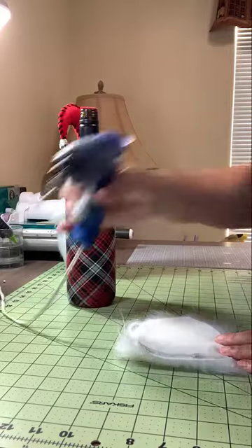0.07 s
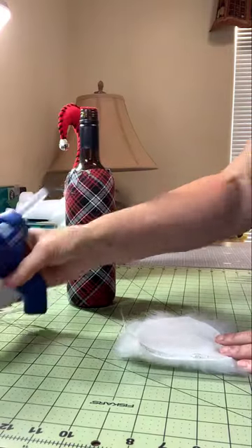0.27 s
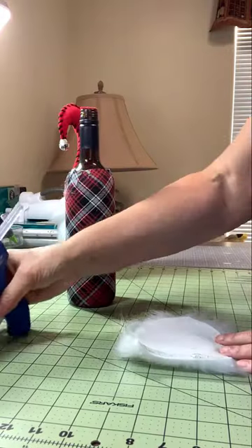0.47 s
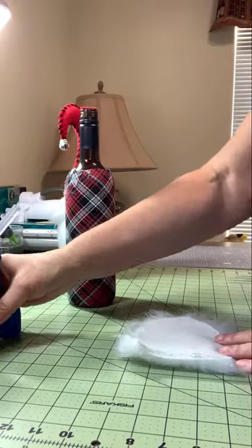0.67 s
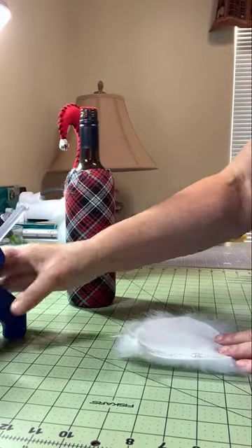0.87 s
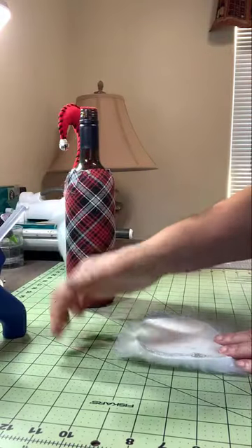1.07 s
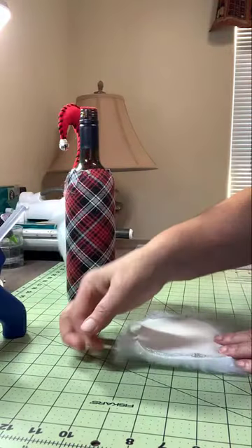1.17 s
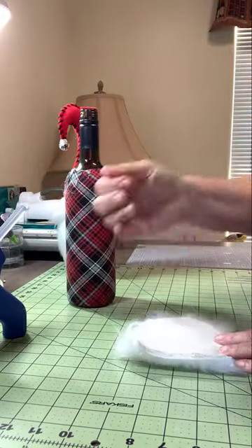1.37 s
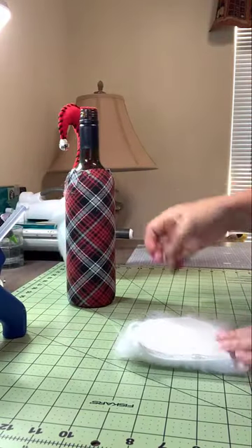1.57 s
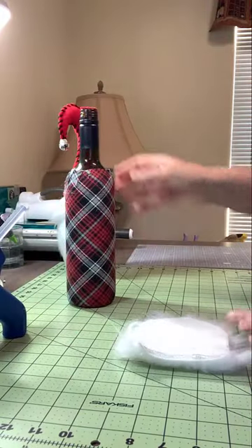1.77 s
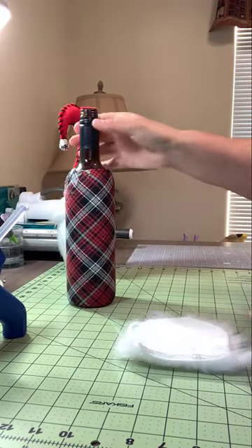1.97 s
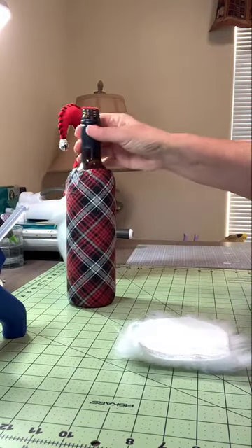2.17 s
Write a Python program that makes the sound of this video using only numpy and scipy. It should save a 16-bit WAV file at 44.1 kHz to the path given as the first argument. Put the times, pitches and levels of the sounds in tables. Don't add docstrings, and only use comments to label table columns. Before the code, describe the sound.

A plastic glue gun clicks in the hand, knocks sharply on a matted table, rattles faintly and lands with a low thud, then small ticks and cloth rubbing follow, close up in a small room.

```python
import sys
import numpy as np
from scipy import signal
from scipy.fft import rfft, irfft
from scipy.io import wavfile

SR = 44100
rng = np.random.default_rng(int(sys.argv[2]) if len(sys.argv) > 2 else 0)


def generate_wav(sig):
    pcm = np.round(np.clip(np.atleast_2d(sig).T, -1, 1) * 32767).astype(np.int16)
    wavfile.write(sys.argv[1], SR, pcm)


def volts_from_decibels(level):
    exponent = np.asarray(level, float) / 20
    return 10 ** exponent


N = 97725

# (time [s], peak level [dB], table modes [dB], table boom [dB], rattle length [s])
KNOCKS = [
    (0.1148, -14, -36.5, -32.5, 0.0065),
    (0.4814, -5.5, -22, -24.5, 0.018),
    (0.8037, -42.5, -13, -41, 0.073),
    (1.149, -31, -22.5, -8, 0.015),
    (1.8191, -22.5, -44, -26.5, 0.016),
]
# (time [s], level [dB])
CLOTH_PRESSURE = [(1.742, -76), (1.83, -64), (1.859, -64), (1.99, -59), (2.065, -58.5), (2.09, -61.5),
                  (2.26, -66)]
GRAINS_PER_S, GRAIN_SPREAD_DB = 6000, 2


def rms_one(x):
    return x / np.sqrt(np.mean(x ** 2) + 1e-20)


def at_hz(points, hz):
    table_hz, values = np.array(points).T
    return np.interp(np.log(hz), np.log(table_hz), values)


def gain_over_time(rows):
    s, db = np.transpose(rows)
    return volts_from_decibels(np.interp(np.arange(N) / SR, s, db, left=-150, right=-150))


def colour(x, spectrum):
    hz = np.arange(4097) * SR / 8192 + 1
    (low_hz, low_db), (high_hz, high_db) = spectrum[0], spectrum[-1]
    curve = [(low_hz / 4, low_db - 30)] + list(spectrum) + [(high_hz * 1.3, high_db - 30)]
    cepstrum = irfft(at_hz(curve, hz) * np.log(10) / 20)
    cepstrum[1:4096] *= 2
    cepstrum[4097:] = 0
    impulse = irfft(np.exp(rfft(cepstrum)))
    return signal.fftconvolve(x, impulse)[:len(x)]


def ring(clicks, hz, t60):
    radius = volts_from_decibels(-60 / (max(t60, 1e-3) * SR))
    angle = 2 * np.pi * hz / SR
    poles = [1, -2 * radius * np.cos(angle), radius * radius]
    return signal.lfilter([0, np.sin(angle)], poles, clicks + 1e-18)


def grains(rate, spread_db, size):
    sizes = volts_from_decibels(spread_db * np.minimum(rng.exponential(1, size), 5))
    sizes = sizes * rng.choice([-1, 1], size)
    return rms_one(sizes * (rng.random(size) < rate / SR))


def table_top(push, modes_db, boom_db):
    # (frequency [Hz], level [dB], t60 [s])
    table_modes = [(210, -18.5, 0.042), (315.4, -9, 0.21), (375.7, -8.5, 0.16), (430, -6.5, 0.07),
                   (449, 4, 0.029), (543, -0.5, 0.09), (605, -12, 0.086), (721, 0.5, 0.025),
                   (765, -11.5, .1), (879, -1, 0.032), (949, -10, .1), (1024, -14, 0.01),
                   (2140, -6, 0.0033), (3720, -3, 0.0071)]
    most_cycles, boom_hz, boom_t60_s, boom_cycles = 72, 135.6, 0.25, 30
    out = volts_from_decibels(boom_db) * ring(push, boom_hz, min(boom_t60_s, boom_cycles / boom_hz))
    for k, (hz, db, t60) in enumerate(table_modes):
        out += (-1) ** k * volts_from_decibels(db + modes_db) * ring(push, hz, min(t60, most_cycles / hz))
    return out


def knocks():
    # (frequency [Hz], level [dB per Hz])
    crack_tones = [
        [(530, -84.5), (900, -2), (2250, 5.5), (3140, 12.5), (3890, -13), (9300, -2.5), (15500, -29)],
        [(710, -39), (1200, 13.5), (2190, 16), (2480, 20), (4480, -3.5), (5260, 9.5), (10200, 9.5), (15500, -8)],
        [(410, -14), (700, 7), (1240, 4), (3680, -12), (4700, -34), (8320, -17), (15500, -59.5)],
        [(150, -38), (250, 6), (1610, -23.5), (1760, -15), (2200, -9.5), (2900, -22.5), (8320, -10),
         (15500, -36)],
        [(2350, -37), (4000, -32), (5590, -34), (6480, -26), (8220, -7), (9960, -13.5), (15500, -21)],
    ]
    click_levels = [17, 9, 8, 2, 6]
    crack_decays = [0.0011, 0.0071, 0.0076, 0.02, .006]
    rattle_levels = [-13, -25, -5, -4, -23.5]
    # (delay [s], level [dB])
    bounces = [
        (.002, 2.5),
        (.0048, 5),
        (0.0095, -1.5),
    ]
    crack_level_db, rattle_per_s, rattle_contrast = -9, 4500, 0.6
    room_crack_db, room_table_db, thump_cut_hz = 0.5, 0.5, 6720

    out, t = np.zeros((2, N + SR)), np.arange(8192) / SR
    start = 1. * (t == 0)
    settings = zip(KNOCKS, crack_tones, rattle_levels, click_levels, crack_decays)
    for (s, db, modes_db, boom_db, rattle_s), tone, rattle_db, click_db, crack_s in settings:
        even_tone = [(hz, rattle_contrast * d) for hz, d in tone]
        scale = np.std(colour(rng.standard_normal(len(t)), tone))

        burst = rng.choice([-1, 1], len(t)) * volts_from_decibels(crack_level_db - 60 * t / crack_s)
        burst = burst - volts_from_decibels(crack_level_db + click_db) * start
        crack = colour(burst, tone) / scale
        room_crack = volts_from_decibels(room_crack_db) * rms_one(colour(start, even_tone)) * np.std(crack)

        rattle = grains(rattle_per_s, 1.63, len(t)) * volts_from_decibels(rattle_db - 60 * t / max(rattle_s * 4, 1e-3))
        rattle = rms_one(colour(rattle, even_tone)) * np.std(rattle)

        i = int(s * SR)
        out[0, i:i + len(t)] += volts_from_decibels(db) * (crack + rattle)
        out[1, i:i + len(t)] += volts_from_decibels(db) * (room_crack + rattle)

        push = np.zeros(len(t) * 3)
        push[0] = -1
        for lag, bounce_db in bounces:
            push[int(lag * SR)] = -volts_from_decibels(bounce_db)
        push = signal.lfilter(*signal.butter(1, thump_cut_hz, fs=SR), push)
        push = push * SR / (2 * np.pi * thump_cut_hz)
        table = table_top(push, modes_db, boom_db)
        out[0, i:i + len(push)] += volts_from_decibels(db) * table
        out[1, i:i + len(push)] += volts_from_decibels(db + room_table_db) * table
    return out[:, :N]


def ticks():
    # (time [s], peak level [dB], pitch [Hz], t60 [s])
    tick_events = [(.004, -48.5, 4275, 0.14), (0.017, -43, 4340, 0.06), (0.0689, -39.5, 2580, 0.011),
                   (0.0697, -47.5, 8500, 0.0099), (.078, -66, 9400, 0.03), (0.2952, -39.5, 11590, 0.06),
                   (0.2933, -57, 5800, 0.032), (.2955, -32.5, 1980, 0.0082), (0.4585, -34, 8640, 0.0061),
                   (0.5374, -40, 12700, .008), (.618, -31, 6400, 0.00094), (1.8148, -35, 8460, 0.0027),
                   (1.828, -42, 8000, 0.011), (1.837, -36.5, 8400, 0.011), (1.856, -34.5, 1690, 0.013),
                   (1.879, -50, 11800, 0.0019), (1.897, -49, 15700, 0.0047), (1.9, -46, 9400, 0.0047),
                   (1.919, -36, 8400, 0.0094), (1.957, -43, 10000, 0.0051), (2.048, -42, 12200, 0.0024),
                   (2.0544, -32, 3080, 0.01), (2.056, -26.5, 7650, 0.00092), (2.1436, -36.5, 1200, 0.0017),
                   (2.158, -42, 9900, 0.0025), (.1215, -44, 2470, 0.0068), (.1255, -29.5, 3780, .008),
                   (.1173, -25, 6400, .003), (0.493, -26, 3530, 0.0053), (0.4938, -36, 7900, 0.0057),
                   (.618, -36.5, 4000, 0.0033), (.618, -36, 9200, 0.0052), (0.629, -49, 3020, .004),
                   (.8055, -44, 8260, 0.014), (.808, -34, 1270, .015), (0.824, -55, 1100, 0.016),
                   (0.837, -37.5, 1000, 0.027), (1.151, -46, 6830, 0.035), (1.152, -40, 4800, 0.0099),
                   (1.823, -48, 8150, .06), (1.8555, -43, 800, 0.0079), (1.876, -42, 2010, 0.037),
                   (1.9166, -37.5, 1880, 0.029), (1.941, -34, 1880, 0.024), (2.054, -37, 850, 0.0088),
                   (2.1427, -38, 2800, 0.0033), (0.194, -36, 1490, .005), (1.848, -41, 8000, .01),
                   (0.753, -55, 4730, 0.026)]
    snap_db, snap_t60_s = -5.5, 0.0012
    out, t = np.zeros(N + SR), np.arange(4096) / SR
    for s, db, hz, t60 in tick_events:
        band = signal.butter(2, [hz / 1.4, min(hz * 1.4, 19000)], "band", fs=SR, output="sos")
        snap = signal.sosfilt(band, rng.standard_normal(len(t)) * volts_from_decibels(-60 * t / snap_t60_s))
        click = signal.sosfilt(band, 1. * (t == 0))
        rings = 0.5 * ring(click, hz, t60) + 0.4 * ring(click, hz * 1.025, t60 * 0.6)
        i = int(s * SR)
        out[i:i + len(t)] += volts_from_decibels(db) * (rings + volts_from_decibels(snap_db) * snap / np.abs(snap).max())
    return out[:N]


def bumps():
    # (time [s], peak level [dB], pitch [Hz], t60 [s])
    bump_events = [(0.063, -33.5, 74, 0.13), (1.844, -37.5, 72, 0.14), (1.851, -46.5, 180, 0.12),
                   (2.055, -37, 66, 0.085), (0.0072, -48.5, 1400, 0.16), (.055, -45.5, 375, .15),
                   (.092, -47.5, 147, 0.15), (1.1495, -41.5, 317, 0.098), (0.6, -43, 570, 0.022),
                   (2.143, -38.5, 1010, .012), (0.32, -49.5, 477, 0.082)]
    out, t = np.zeros(N), np.arange(N) / SR
    for s, db, hz, t60 in bump_events:
        push = np.clip(1 - np.abs(t - s) * 4 * hz, 0, 1)
        out += volts_from_decibels(db) * ring(push / push.sum(), hz, t60)
    return out


def rubbing():
    # (time [s], level [dB])
    cord_pressure = [(0, -53), (0.036, -65.5), (.062, -65.5), (0.076, -58.5), (.108, -66), (.125, -63.5),
                     (.195, -51.5), (.25, -61.5), (.3, -56.5), (.34, -66), (0.462, -67)]
    # (time [s], level [dB])
    mat_pressure = [(0.728, -76), (.79, -60), (.83, -59), (.93, -62), (1.001, -73)]
    # (frequency [Hz], level [dB per Hz])
    cord_tone = [(88, -61), (200, -6.5), (433, -4), (567, -2), (612, 1.5), (802, -6), (936, -2),
                 (2860, -10.5), (15000, -19)]
    # (frequency [Hz], level [dB per Hz])
    mat_tone = [(120, -52), (200, -19), (630, -5), (873, -13), (1190, -5.5), (2160, -13), (2360, -18),
                (12000, -40), (15600, -57), (22000, -120)]
    # (frequency [Hz], level [dB per Hz])
    cloth_tone = [(88, -10.5), (150, -2), (412, 5), (996, -3), (1780, -4), (3060, -12.5), (4500, -18),
                  (5850, -86), (9900, -120)]
    surface_levels = [6.5, 5.5, 8.5]
    pressures = (cord_pressure, mat_pressure, CLOTH_PRESSURE)
    out = np.zeros(N)
    for pressure, tone, db in zip(pressures, (cord_tone, mat_tone, cloth_tone), surface_levels):
        friction = rms_one(colour(grains(GRAINS_PER_S, GRAIN_SPREAD_DB, N), tone))
        out += volts_from_decibels(db) * gain_over_time(pressure) * friction
    return out


def cloth_hiss():
    # (frequency [Hz], level [dB per Hz])
    fibre_tone = [(2650, -49), (4500, -17), (5700, -8), (6670, -10.5), (8790, -8), (11100, -20),
                  (15000, -20)]
    hiss_db, flutter_db, follows_pressure = -59, 2, 0.52
    loudest = volts_from_decibels(max(db for s, db in CLOTH_PRESSURE))
    swell = (gain_over_time(CLOTH_PRESSURE) / loudest) ** follows_pressure
    gripped = np.arange(N) > KNOCKS[-1][0] * SR
    fibres = rms_one(colour(grains(GRAINS_PER_S, GRAIN_SPREAD_DB, N), fibre_tone))
    flutter = rms_one(signal.lfilter(*signal.butter(2, 30., fs=SR), rng.standard_normal(N)))
    return volts_from_decibels(hiss_db + flutter_db * flutter) * swell * gripped * fibres


def squeak():
    # (time [s], level [dB], pitch [Hz])
    glide = [
        (1.843, -57, 1898),
        (1.879, -58, 2030),
        (1.901, -59.5, 1981),
        (1.919, -54, 1946),
        (1.945, -53.5, 2013),
        (1.989, -54, 1804),
        (2.04, -56.5, 1813),
        (2.074, -63, 1790),
    ]
    narrow_hz, flutter_db = 260, 2.
    t, (s, db, hz) = np.arange(N) / SR, np.transpose(glide)
    phase = 2 * np.pi * np.cumsum(np.interp(t, s, hz)) / SR
    growing_db = -10.5 + 75.5 * np.clip(t - s[0], 0, 1)
    out = np.zeros(N)
    for ratio, gain_db in ((1, 0), (1.26, -10), (1.55, growing_db)):
        narrow = signal.butter(2, narrow_hz * ratio ** 3 / 2, fs=SR)
        a, b = signal.lfilter(*narrow, rng.standard_normal((2, N)))
        band = rms_one(a * np.cos(ratio * phase) + b * np.sin(ratio * phase))
        flutter = rms_one(signal.lfilter(*signal.butter(2, 40., fs=SR), rng.standard_normal(N)))
        out += volts_from_decibels(gain_db + flutter_db * flutter) * band
    return gain_over_time(list(zip(s, db))) * out


def room(x):
    # (frequency [Hz], t60 [s])
    room_decay = [(150, 0.5), (400, 0.51), (1000, 0.4), (2500, 0.53), (6000, 0.32), (10000, 0.26),
                  (15000, 0.022)]
    tail_db, tail_start_s = -7, 0.0021
    t, tail = np.arange(SR // 2) / SR, 0
    edges = 90 * 2 ** np.arange(0, 7.6, 0.25)
    for low, high in zip(edges, edges[1:]):
        t60 = max(at_hz(room_decay, np.sqrt(low * high)), 0.02)
        band_filter = signal.butter(2, [low, high], "band", fs=SR, output="sos")
        band = signal.sosfilt(band_filter, rng.standard_normal(len(t)))
        tail = tail + band * volts_from_decibels(-60 * t / t60) / np.sqrt(t60 * SR / 14)
    tail = tail * np.clip(t / tail_start_s, 0, 1) ** 2
    return volts_from_decibels(tail_db) * signal.fftconvolve(x, tail)[:N]


def room_hiss():
    # (frequency [Hz], level [dB per Hz])
    hiss_tone = [(20, 8), (60, -20.5), (100, -23.5), (300, -30), (1200, -41.5), (4500, -51), (9000, -49),
                 (16000, -54)]
    floor_db, early_db, top_hz = -43.5, -3, 15500
    t = np.arange(N) / SR
    noise = rms_one(colour(rng.standard_normal(N + SR), hiss_tone)[SR:])
    hiss = volts_from_decibels(floor_db + early_db * (t < KNOCKS[0][0])) * noise
    return signal.sosfilt(signal.butter(8, top_hz, fs=SR, output="sos"), hiss)


def hum():
    # (frequency [Hz], level [dB])
    hum_tones = [(60, -56.5), (120, -91), (1200, -72), (2040, -81)]
    t = np.arange(N) / SR
    return sum(volts_from_decibels(db) * np.sin(2 * np.pi * hz * t + k) for k, (hz, db) in enumerate(hum_tones))


def air_pressure():
    # (time [s], level [dB])
    swing = [(0.0, -8), (.25, -26.5), (.6, -34.5), (1.5, -37.5), (2.26, -35.5)]
    air_hz = 4.31
    t = np.arange(N) / SR
    band = signal.butter(2, [air_hz / 3, air_hz], "band", fs=SR / 100, output="sos")
    slow = signal.sosfilt(band, rng.standard_normal(N // 100 + 1000))[900:]
    slow = rms_one(signal.resample_poly(slow, 100, 1)[500:N + 500])
    fade = np.clip(np.minimum(t, t[-1] - t) * 20, 0, 1)
    return gain_over_time(swing) * fade * slow


def scene():
    (near, spread), small = knocks(), ticks()
    thin = signal.lfilter(*signal.butter(1, 150, "high", fs=SR), spread + small)
    contacts = near + small + room(thin) + bumps()
    hands = rubbing() + cloth_hiss() + squeak()
    background = room_hiss() + hum() + air_pressure()
    return (contacts + hands + background)[None]


def low_pass(x):
    return signal.sosfilt(signal.butter(12, 16830, fs=SR, output="sos"), x)


def record(dry):
    top_hz = 16300
    mix = signal.sosfilt(signal.cheby1(8, 1, top_hz, fs=SR, output="sos"), dry)
    return low_pass(mix)


dry = scene()
out = record(dry)
generate_wav(out)
```